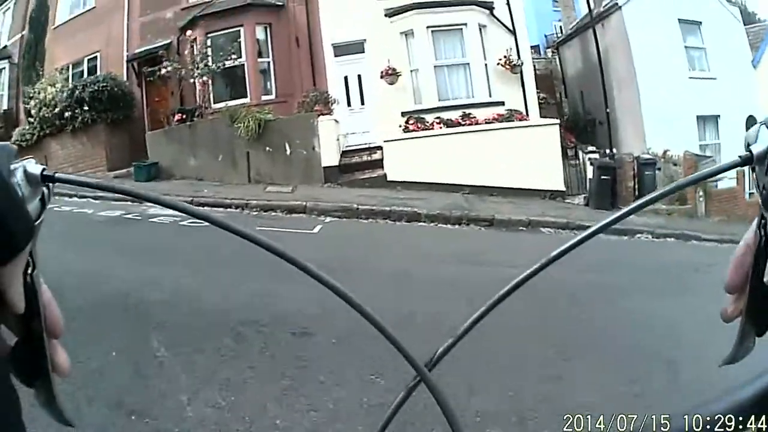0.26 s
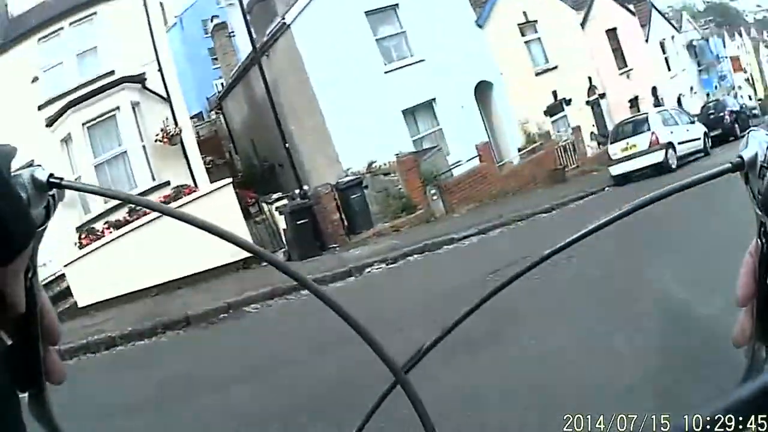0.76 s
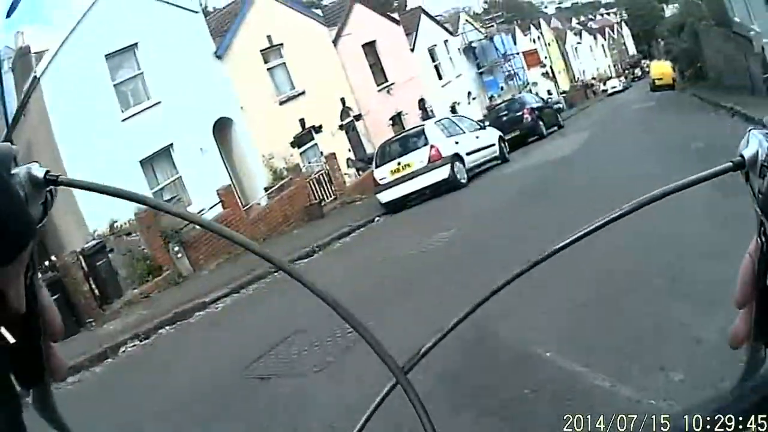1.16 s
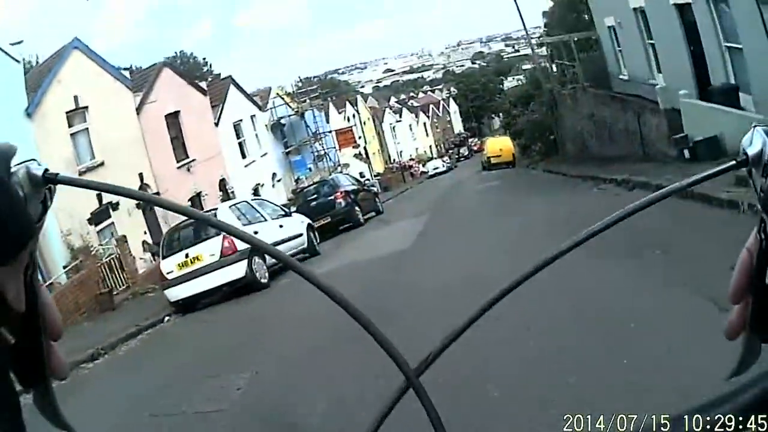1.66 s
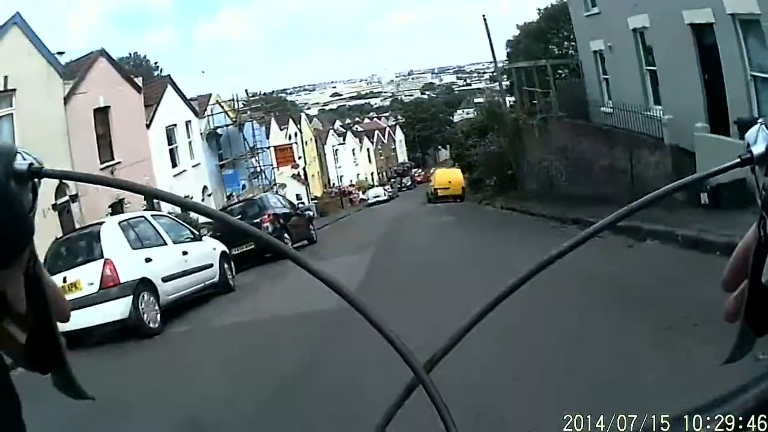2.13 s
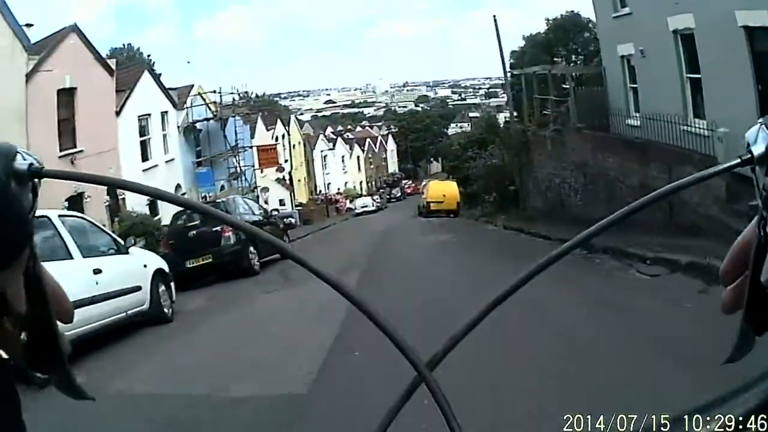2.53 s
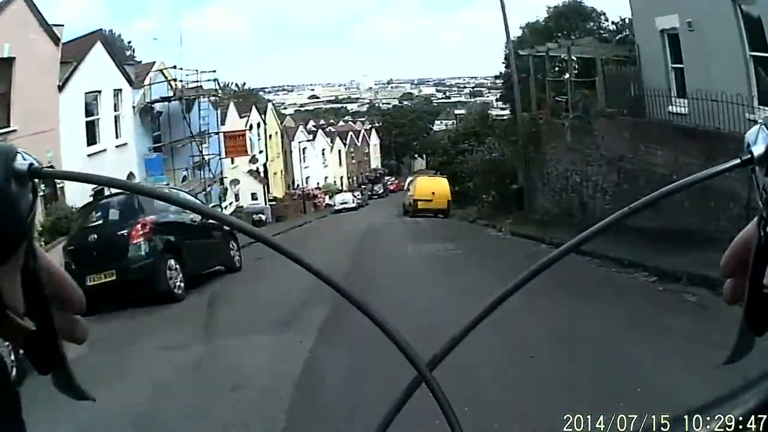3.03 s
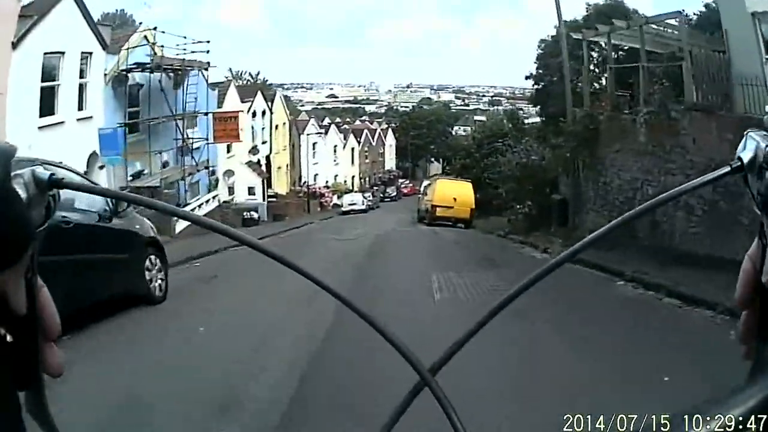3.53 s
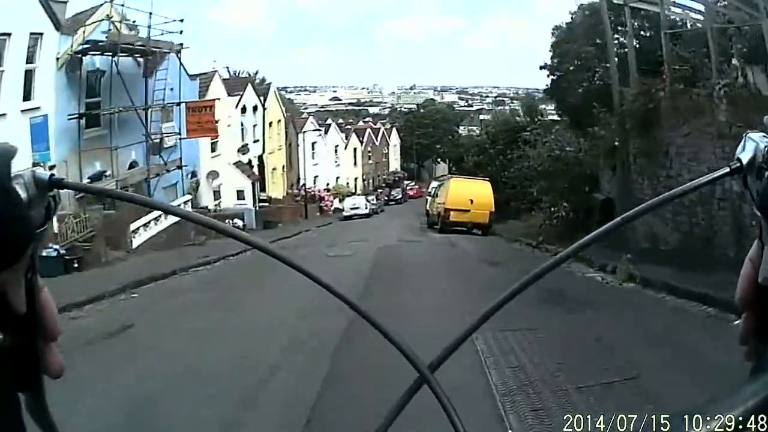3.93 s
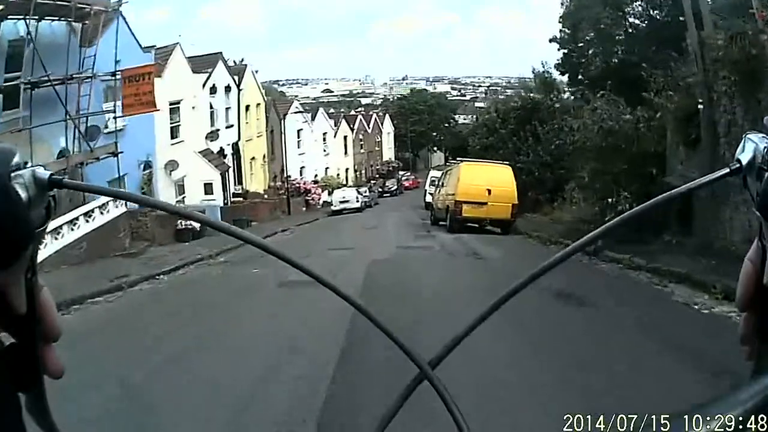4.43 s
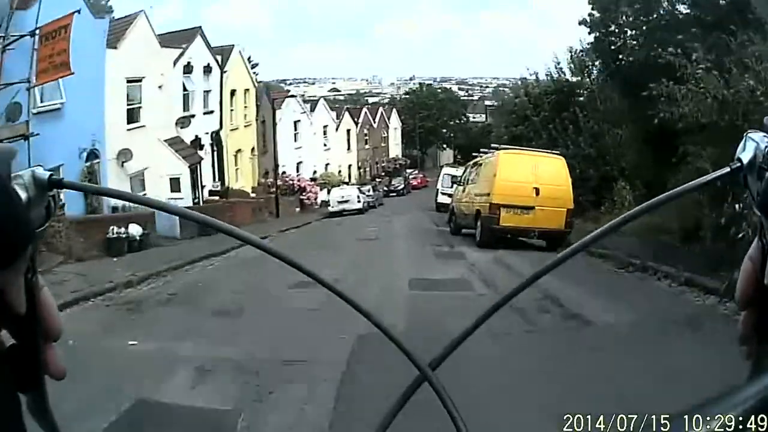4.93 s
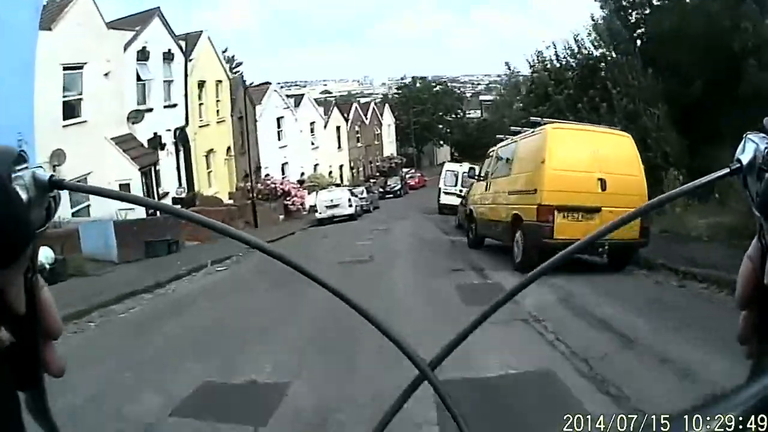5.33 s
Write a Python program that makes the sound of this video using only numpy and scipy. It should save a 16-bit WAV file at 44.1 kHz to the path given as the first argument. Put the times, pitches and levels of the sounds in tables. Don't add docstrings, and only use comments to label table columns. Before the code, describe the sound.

A bicycle gathers speed down a street as wind buffeting the microphone swells, with soft mount rattles and a hard lever click near two seconds.

```python
import sys
import numpy as np
from scipy import signal
from scipy.fft import rfft, irfft, next_fast_len
from scipy.io import wavfile
from scipy.ndimage import uniform_filter1d

SR = 44100
rng = np.random.default_rng(int(sys.argv[2]) if len(sys.argv) > 2 else 0)


def master_out(mix):
    frames = np.transpose(np.atleast_2d(mix))
    ceiling = np.clip(frames, -1, 1)
    pcm = np.round(ceiling * 32767).astype(np.int16)
    wavfile.write(sys.argv[1], SR, pcm)


def nominal_scale(level):
    x = np.asarray(level, float) / 20
    return 10 ** x


N = 246519

# (time [s], share [1])
SPEED = [(0, 0.22), (.7, 0.34), (1.3, 0.39), (2.0, 0.45), (2.7, 0.61), (3.5, 0.81), (4.2, 0.89), (5.0, 1),
         (5.59, 1)]
# (time [s], level over the steady wind [dB], half width [s])
GUSTS = [(.4, 13, 0.042), (.56, -6, 0.032), (.64, 8.5, 0.026), (.79, 2.5, 0.071), (1.09, -8, 0.17),
         (1.68, 4.5, 0.035), (1.84, 6, .07), (2.04, -12, 0.015), (2.08, 5, 0.12), (2.27, 2, 0.022),
         (2.52, -1, 0.015), (2.79, -2, 0.032), (2.85, 12.5, 0.012), (2.93, -2.5, 0.045), (2.97, 3.5, 0.047),
         (3.16, -6, 0.022), (3.27, 3.5, 0.028), (3.38, -4.5, 0.062), (3.65, -4, 0.072), (3.92, 1, 0.17),
         (4.0, -6.5, 0.034), (4.05, 1.5, 0.027), (4.23, -5.5, 0.023), (4.55, 2, 0.022), (4.6, -2, 0.033),
         (4.72, 0, .025), (5.06, 4, 0.041), (5.35, -4, 0.044), (5.53, -4, 0.057)]
# (time [s], half width [s], shake level [dB], small-eddy level [dB])
PATCHES = [(.3, 0.11, -2, -4.5), (.43, 0.037, 4, 3), (.63, 0.026, -1.5, 6.5), (.82, 0.09, 5, -1),
           (1.17, 0.052, -1, -5), (1.55, 0.071, -0.5, 3.5), (1.69, 0.032, 3.5, 6.5),
           (1.96, 0.058, 7.5, 3.5), (2.75, 0.02, 1, 5.5), (3.4, 0.043, -2, -1.5), (3.66, 0.031, 0, 2.5),
           (4.3, 0.055, 0, -3), (4.48, 0.038, 1, 1.5), (5.2, 0.048, 1, 3), (5.441, 0.023, 3, 4)]

# (frequency [Hz], density [dB per Hz])
HISS = [(1500, 1), (4000, -2.5), (6500, -3.5), (9000, -3), (12000, -3), (13500, -5), (14500, -30)]
# (frequency [Hz], density [dB per Hz])
BRIGHT = [(7000, -9), (10000, -9), (12500, -9), (13800, -1), (14500, -15)]
# (time [s], peak level [dB])
SPITS = [(3.5895, -54), (3.8136, -53), (4.2337, -54), (4.8807, -55), (4.946, -52), (5.0094, -51),
         (5.0638, -53), (5.0962, -48), (5.1536, -54), (5.2314, -54), (5.2603, -52), (5.5512, -50)]
# (time [s], peak level [dB])
STONES = [(0.4354, -50), (0.4559, -41), (0.8024, -54), (1.5744, -60), (1.6711, -52), (1.6925, -44),
          (1.7114, -46), (2.9692, -41), (2.9841, -47), (3.0692, -42), (3.8132, -43), (4.3394, -47),
          (4.9594, -38), (5.223, -39), (5.239, -39), (5.4191, -38), (5.4304, -38), (5.4535, -36),
          (5.5108, -34)]
# (frequency [Hz], density [dB per Hz])
STONE_SPECTRUM = [(800, -29), (1150, -2), (1600, -4), (2100, -5), (2600, 0), (3200, -33)]

# (time [s], body level [dB], thud level [dB], clack level [dB], ring time [s])
KNOCKS = [
    (1.93, -14, -19, -29.5, 0.021),
    (1.9914, -8, -17, -30, 0.038),
    (1.9955, -24, -34, -33.5, 0.027),
    (2.0036, -14.5, -45, -60, 0.014),
    (2.08, -35, -60, -64, 0.034),
]
# (frequency [Hz], level [dB], share of ring time [1])
THUD_MODES = [(470, -5.5, 2.3), (565, 5.5, 1.17), (670, -5, 0.8)]
BODY_MODES = [(735, -14, 0.96), (764, -3, 0.95), (890, -7, 1.1), (1120, -12, 0.6)]
CLACK_MODES = [(2180, -8, 0.34), (2270, 7.5, 0.47), (2570, 3.5, 0.3), (2960, -5, 0.37), (3380, -20, 0.93)]
TICK_MODES = [(4380, 8, 0.33), (4770, 1, 0.5), (5680, 4.5, 0.37), (6400, 7.5, 0.11), (7200, 4.5, .12),
              (8650, 1, 0.089), (10000, 7, .08), (11400, 11, 0.064), (12800, -5, .08)]

# (time [s], body level [dB], thud level [dB], clack level [dB])
RATTLES = [(0.147, -39, -35, -68), (0.259, -45, -36, -70), (0.381, -30, -50, -61),
           (0.3995, -44, -29.5, -51), (0.4025, -36, -25, -49), (0.4252, -29, -24.5, -53),
           (0.435, -52, -39, -62), (0.455, -32.5, -41, -53), (0.803, -30, -29.5, -63),
           (0.842, -38, -44, -63), (0.865, -34, -39, -59), (0.881, -30.5, -37, -47), (0.911, -40, -40, -57),
           (0.95, -33, -35.5, -67), (1.461, -39, -54, -76), (1.673, -32, -36.5, -58),
           (1.693, -27, -48, -56), (1.712, -30, -43, -59), (1.859, -36, -41, -61), (2.112, -36, -41, -71)]
# (time [s], body level [dB], thud level [dB], clack level [dB])
SEAMS = [(2.824, -39, -46, -63), (2.926, -31, -40, -50.5), (2.966, -32, -54, -68), (2.982, -45, -52, -66),
         (3.07, -52, -45, -66), (3.545, -27, -42, -54), (3.811, -47, -22, -45), (4.259, -46, -35, -51),
         (4.34, -40, -50, -60), (4.668, -36, -22, -43.5), (4.94, -46, -27, -45), (5.203, -24, -38, -49),
         (5.223, -34, -28, -42.5), (5.419, -39, -34, -49), (5.43, -25, -41, -45),
         (5.454, -22, -17.5, -42.5), (5.51, -28, -42, -60)]
# (frequency [Hz], width [Hz], level [dB])
MOUNT = [
    [(701, 136, -4.5), (858, 60, -6.5), (1160, 230, -35)],
    [(348, 250, 2.5), (486, 176, -2)],
    [(2250, 150, -22), (2710, 143, 7.5), (3270, 115, -2.5)],
    [(4340, 790, 7), (4700, 760, -12)],
]

# (start time [s], length [s], rub level [dB], whistle level [dB])
SQUEEZES = [
    (-.1, 0.19, -72, -81),
    (.2, 0.33, -76, -90),
    (0.604, .65, -70, -94),
    (2.7, .3, -74, -88),
    (3.01, 0.26, -72, -70.5),
    (3.388, 0.55, -60, -73.5),
    (3.785, 2.14, -58, -69),
]
# (frequency [Hz], width [Hz], level [dB])
RIM = [(2733, 315, 7), (3440, 280, 3.5), (4360, 990, 5.5), (4930, 770, 4.5), (5670, 200, -1),
       (6980, 560, -3), (8600, 660, -4.5), (11600, 1100, -5)]
# (frequency [Hz], width [Hz], level [dB])
WHISTLE = [(4670, 530, 0)]

# (frequency [Hz], density [dB per Hz])
ROAD = [(500, 4.5), (700, -6.5), (950, -16), (1200, -7.5), (1600, -10.5), (2200, -18), (3200, -28),
        (4500, -70), (6000, -63)]
# (frequency [Hz], width [Hz], level [dB])
HOUSING = [(801, 178, 4), (871.7, 104, 9), (2180, 270, -26.5), (2657, 190, -12.5), (3430, 80, -52.5)]

# (frequency [Hz], density [dB per Hz])
EDDIES = [(70, -57), (110, -11), (160, -1), (250, -6), (400, -13), (600, -20.5), (800, -27.5), (1100, -45)]
# (frequency [Hz], density [dB per Hz])
BUFFET_SLOW = [(8, -42), (14, 0), (25, 3), (40, 6), (55, -4.5), (75, -1.5), (100, -2), (130, -10.5),
               (170, -11), (260, -76)]
BUFFET_FAST = [(8, -54), (14, -3.5), (25, 1), (38, -4.5), (48, 2), (60, 2), (70, -2.5), (85, -7.5),
               (110, -8.5), (130, -8.5), (170, -27.5), (260, -32)]


def rms_one(x):
    return x / np.sqrt(np.mean(x ** 2) + 1e-20)


def in_time(rows):
    s, *columns = np.transpose(rows)
    return [np.interp(np.arange(N) / SR, s, c) for c in columns]


def swells(rows):
    t = np.arange(N) / SR
    return sum(db * np.exp(-((t - s) / width_s) ** 2) for s, db, width_s in rows)


def drift(rate):
    r = np.exp(-40 * np.pi * rate / SR)
    slow = signal.lfilter([1], [1, -2 * r, r * r], rng.standard_normal(N // 20 + 4002))[4000:]
    return np.interp(np.arange(N) / 20, np.arange(len(slow)), rms_one(slow))


def coloured(x, spectrum):
    size = next_fast_len(N)
    hz = np.fft.rfftfreq(size, 1 / SR) + 1
    points = np.array(spectrum)
    gain_db = np.interp(np.log(hz), np.log(points[:, 0]), points[:, 1], left=-90, right=-90)
    return rms_one(irfft(rfft(x, size) * nominal_scale(gain_db), size)[:N])


def resonate(x, peaks):
    out = 0
    for k, (hz, width_hz, level_db) in enumerate(peaks):
        r = np.exp(-np.pi * width_hz / SR)
        b = (1 - r * r) / 2 * np.array([1, 0, -1])
        a = [1, -2 * r * np.cos(2 * np.pi * hz / SR), r * r]
        out = out + (-1) ** k * nominal_scale(level_db) * signal.lfilter(b, a, x)
    return out


def grit(per_s, noise):
    sizes = nominal_scale(1.5 * np.minimum(rng.exponential(1, N), 4))
    jolts = (rng.random(N) < per_s / SR) * sizes
    return rms_one(jolts * rng.choice([-1, 1], N)) + noise * rng.standard_normal(N)


def evened(x, span_s, share):
    size = int(span_s * SR)
    swell = uniform_filter1d(uniform_filter1d(x ** 2, size=size), size=size)
    return rms_one(x / (swell + 1e-3) ** (share / 2))


def puffs(events, spectrum, rise_s, trim_db):
    marks = np.zeros(N)
    marks[[round(s * SR) for s, db in events]] = nominal_scale(np.array(events)[:, 1] + trim_db)
    t = np.arange(800) / SR / rise_s
    return np.convolve(marks, t * np.exp(1 - t))[:N] * coloured(rng.standard_normal(N), spectrum)


def ride():
    speed = np.clip(in_time(SPEED)[0], 0.05, 1.2)
    decades = np.log10(speed)
    gust_db = swells(GUSTS)
    stir_db = swells([(s, db, width_s) for s, width_s, _, db in PATCHES])
    rough_db = swells([(s, db, width_s) for s, width_s, db, _ in PATCHES])
    buffet_db = -16.5 + 37.8 * decades + gust_db
    eddy_db = -25.5 + 42.7 * decades + 0.51 * (1 - speed) * gust_db + stir_db
    shake_db = -40 + 33.6 * decades + rough_db
    return buffet_db, eddy_db, shake_db


def hiss(eddy_db):
    level_db = -65.5 + 0.05 * (eddy_db + 39.0) + 0.89 * drift(5.1)
    return nominal_scale(level_db) * coloured(rng.standard_normal(N), HISS)


def bright_noise(eddy_db):
    level_db = 1.55 * eddy_db - 27.5 + 2.0 * drift(4.6)
    return nominal_scale(level_db) * coloured(rng.standard_normal(N), BRIGHT)


def spits():
    air = puffs(SPITS, BRIGHT, rise_s=0.0017, trim_db=-3.5)
    stones = puffs(STONES, STONE_SPECTRUM, rise_s=0.00058, trim_db=-1.0)
    return air + stones


def rattles():
    hits = [(*row, 0.0038) for row in RATTLES] + [(*row, 0.0033) for row in SEAMS]
    out, luck = np.zeros(N + 1500), rng.standard_normal((len(hits), 1500))
    t = np.arange(1500) / SR
    for (s, *group_db, contact_s), rough in zip(hits, luck):
        tick_db = -31.5 + 0.48 * group_db[-1]
        rise = t / np.clip(0.26 * contact_s, 0.0002, 0.006)
        push = rise * np.exp(1 - rise) * rough
        for level_db, peaks in zip([*group_db, tick_db], MOUNT):
            for hz, width_hz, db in peaks:
                skirt = [(hz, 2.65 * width_hz, 0)]
                ring = resonate(push, [(hz, width_hz, 0)])
                ring = resonate(resonate(ring, skirt), skirt)
                out[round(s * SR):][:1500] += nominal_scale(level_db + db - 4.5) * ring / np.abs(ring).max()
    return out[:N]


def knocks():
    out, luck = np.zeros(N + 4000), rng.standard_normal((len(KNOCKS), 24))
    t = np.arange(4000) / SR
    for (s, body_db, thud_db, clack_db, ring_s), dice in zip(KNOCKS, luck):
        groups = [(BODY_MODES, body_db), (THUD_MODES, thud_db), (CLACK_MODES, clack_db),
                  (TICK_MODES, body_db - 33)]
        modes = [(hz, db + group_db, share) for group, group_db in groups for hz, db, share in group]
        for (hz, db, share), chance in zip(modes, dice):
            ring = np.sin(2 * np.pi * hz * (1 + 0.01 * chance) * t)
            decay = nominal_scale(-60 * t / max(ring_s * share, 0.001))
            onset = 1 - np.exp(-t * hz / 0.45)
            out[round(s * SR):][:4000] += nominal_scale(db - 1.5 + 1.1 * chance) * ring * decay * onset
    return out[:N]


def brake():
    t = np.arange(N) / SR
    grip_s, let_go_s = 0.03, 0.12
    held = []
    for s, length_s, *_ in SQUEEZES:
        release = np.exp(-np.maximum(t - s - length_s, 0) / let_go_s)
        held.append(np.clip((t - s) / grip_s, 0, 1) * release)
    levels = nominal_scale(np.transpose(SQUEEZES)[2:] + 5.0)
    rub, song = (np.max(level[:, None] * held, axis=0) for level in levels)
    scratch = grit(2500.0, noise=0.73) * nominal_scale(1.1 * drift(30.0))
    rubbing = rms_one(resonate(resonate(scratch, RIM), RIM))
    singing = rms_one(resonate(resonate(scratch, WHISTLE), WHISTLE))
    return rub * rubbing + song * singing


def road(shake_db, gust):
    jolts = grit(900.0, noise=0.95) * nominal_scale(0.71 * gust + 0.69 * drift(49.0))
    fork = nominal_scale(-3.0) * coloured(jolts, ROAD)
    housing = nominal_scale(19.5) * resonate(rms_one(jolts), HOUSING)
    return nominal_scale(shake_db) * rms_one(fork + housing)


def wind(buffet_db, eddy_db, gust):
    air = rng.standard_normal(N) * nominal_scale(0.83 * drift(3.0))
    speed = in_time(SPEED)[0]
    thump = (1 - speed) * coloured(air, BUFFET_SLOW) + speed * coloured(air, BUFFET_FAST)
    lumps = rng.standard_normal(N) * nominal_scale(1.3 * gust + 2.12 * drift(4.4))
    flutter = coloured(lumps, EDDIES)
    large = nominal_scale(buffet_db) * evened(thump, 0.071, share=0.31)
    small = nominal_scale(eddy_db) * evened(flutter, 0.033, share=0.45)
    return large + small


def scene():
    buffet_db, eddy_db, shake_db = ride()
    gust = drift(48.0)
    background = hiss(eddy_db) + bright_noise(eddy_db) + spits()
    contacts = rattles() + knocks() + brake()
    return (background + contacts + road(shake_db, gust) + wind(buffet_db, eddy_db, gust))[None]


def thinned(x, from_hz, edge_hz, band_hz, hole_db):
    hz, _, frames = signal.stft(x, SR, "cosine", nperseg=2048)
    loud_db = 10 * np.log10(np.sum(np.abs(frames) ** 2, axis=0) + 1e-12)
    band = (hz / band_hz).astype(int)
    treble = np.clip(hz / from_hz - 1, 0, 1.3)[:, None]
    odds = np.clip(0.012 * (loud_db + 37.0), 0.03, 0.6) * treble
    dice = rng.random((400, frames.shape[1]))
    edge = edge_hz + 1000.0 * (dice[-1] - 0.5)
    keep = np.where((dice[band] < odds) | (hz[:, None] > edge), nominal_scale(hole_db), 1)
    return signal.istft(frames * keep, SR, "cosine", nperseg=2048)[1][:N]


def roll_off(x):
    return signal.sosfilt(signal.butter(12, 14030, fs=SR, output="sos"), x)


def record(dry):
    rounded = 1.458 * np.tanh(dry[0] / 1.536) + 0.0034
    mix = thinned(rounded, from_hz=3800, edge_hz=13300, band_hz=170, hole_db=-20)[None]
    return roll_off(mix)


dry = scene()
out = record(dry)
master_out(out)
```